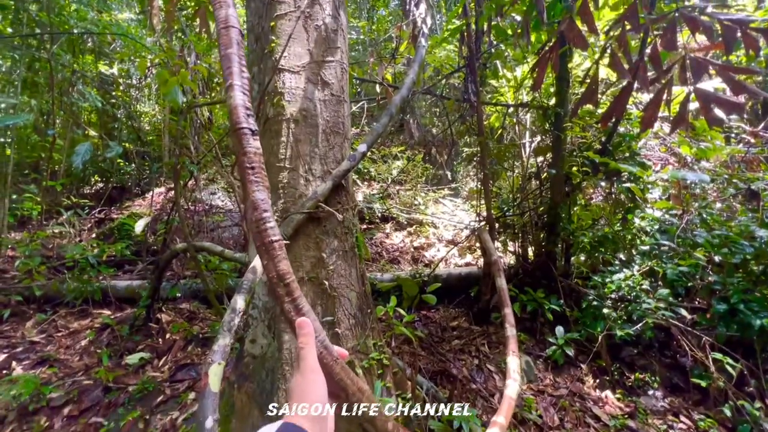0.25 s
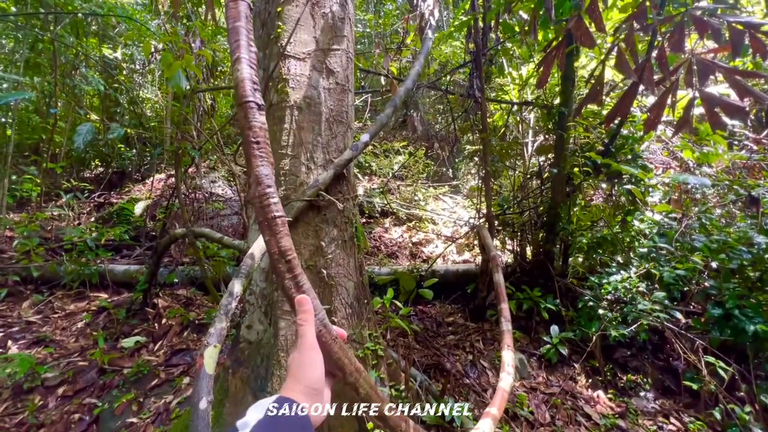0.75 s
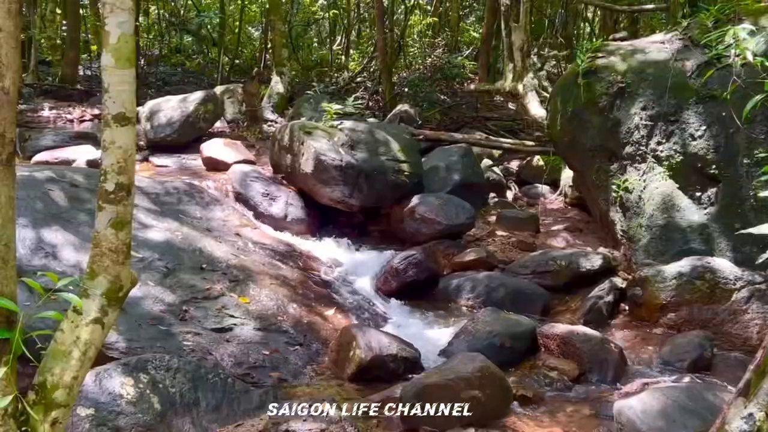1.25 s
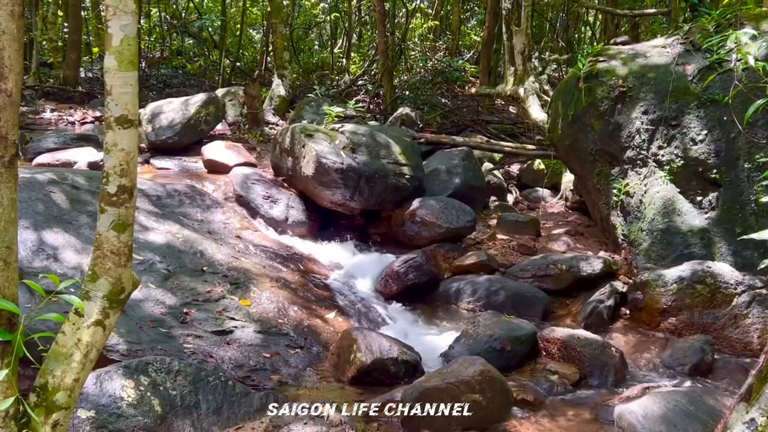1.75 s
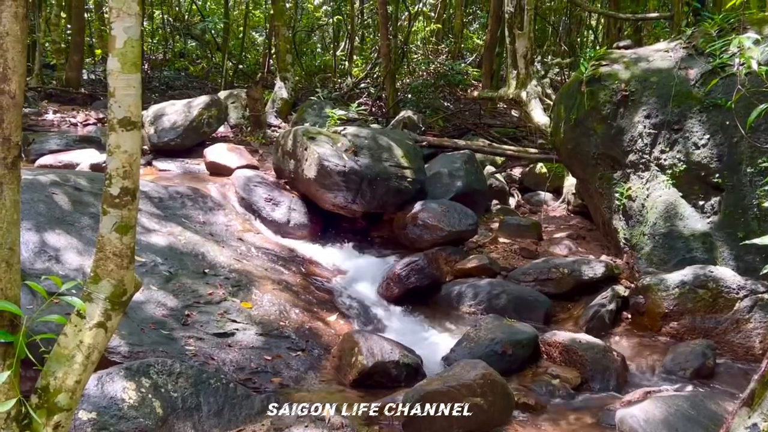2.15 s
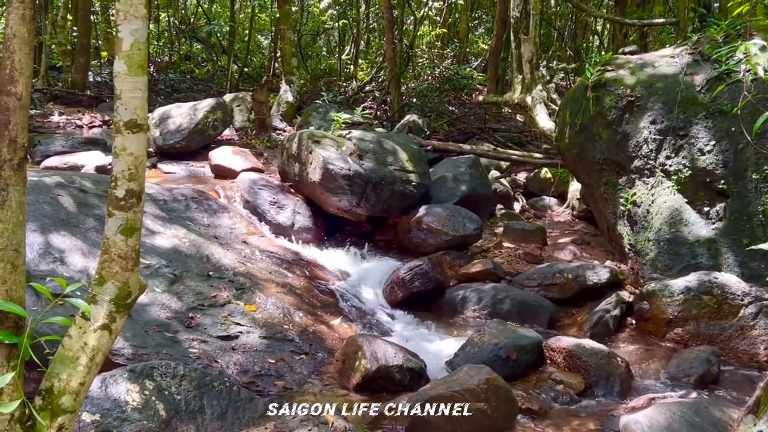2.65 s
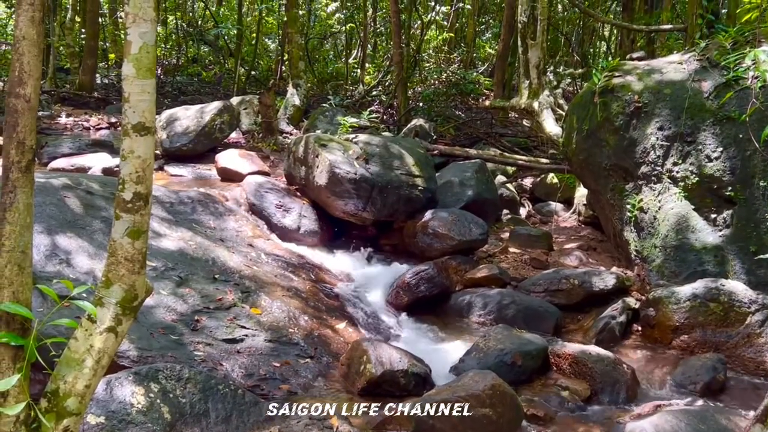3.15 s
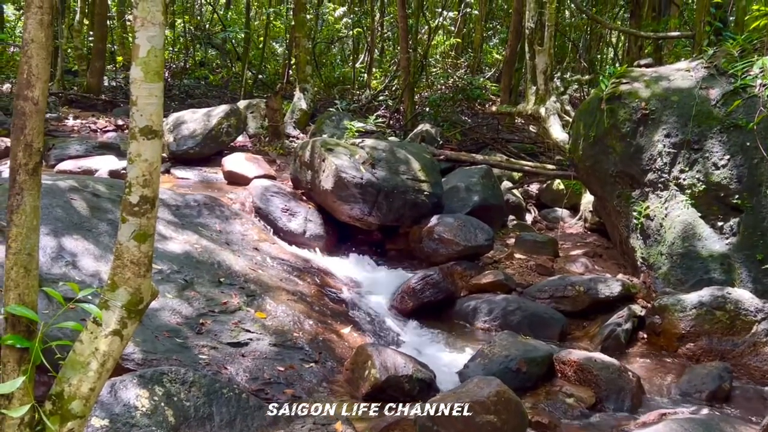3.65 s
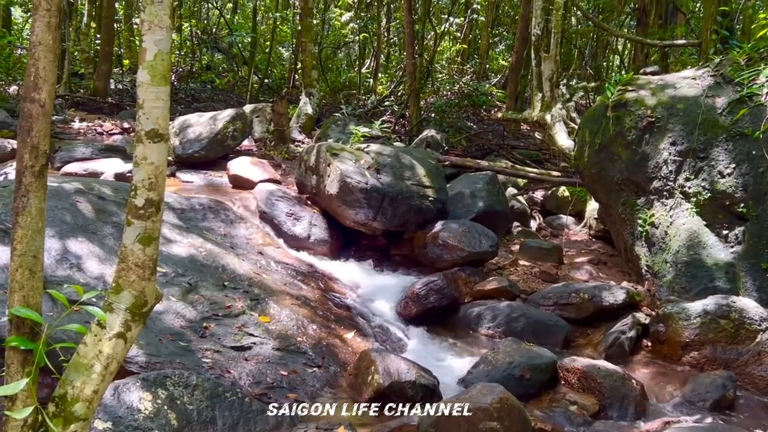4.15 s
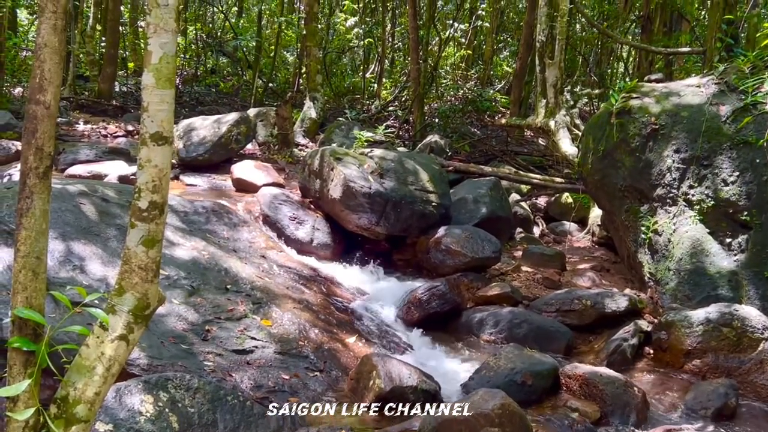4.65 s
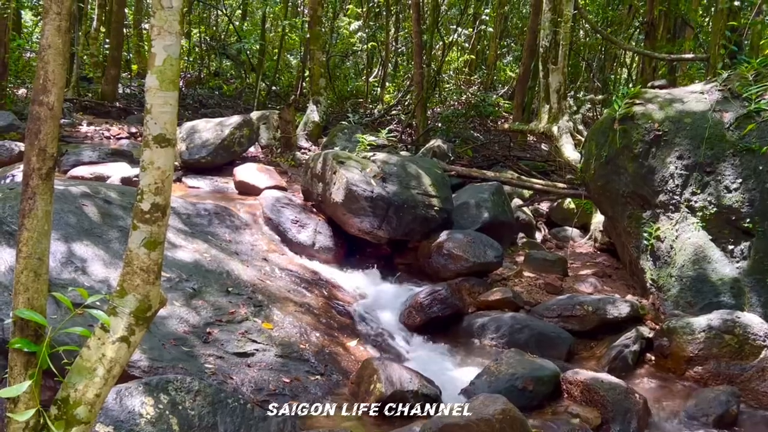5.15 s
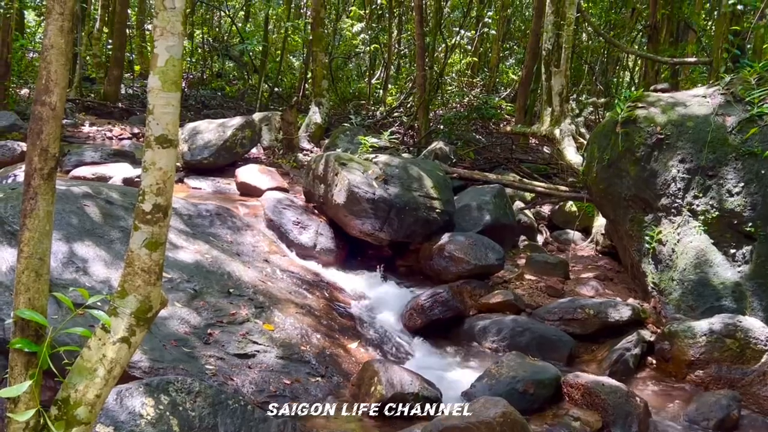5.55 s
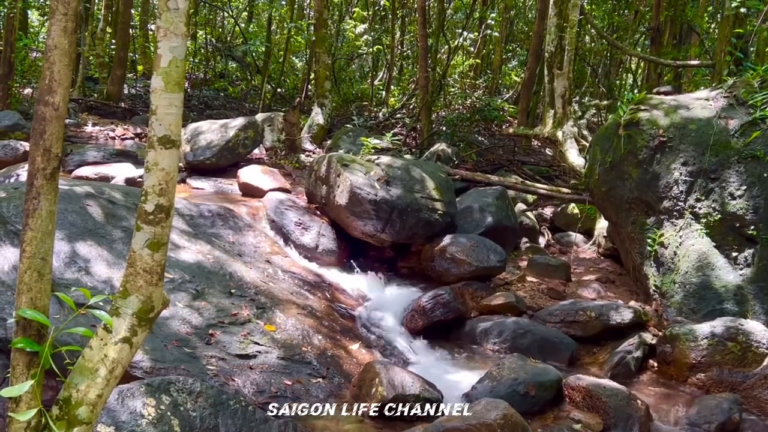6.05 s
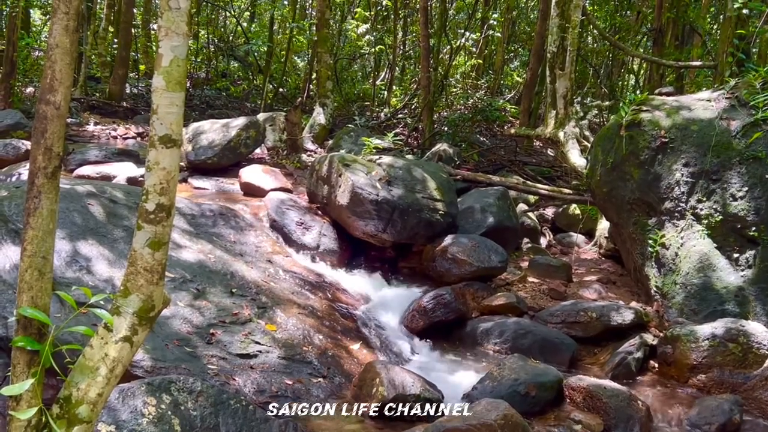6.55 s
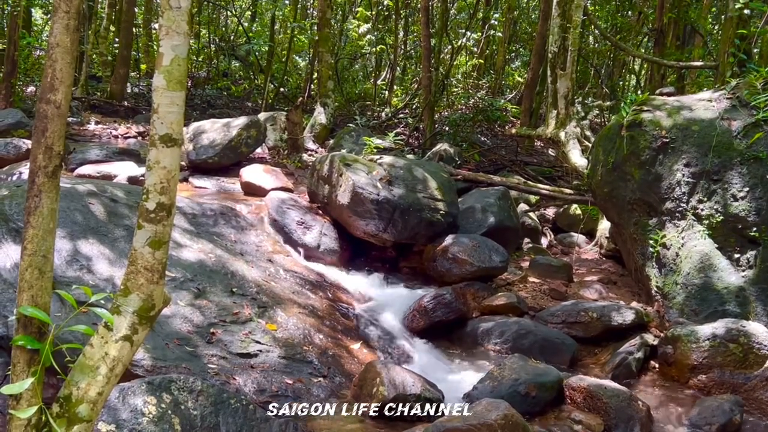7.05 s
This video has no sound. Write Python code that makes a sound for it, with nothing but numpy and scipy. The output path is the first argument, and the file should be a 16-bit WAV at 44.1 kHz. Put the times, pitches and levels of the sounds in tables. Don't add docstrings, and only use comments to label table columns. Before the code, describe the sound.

Outdoors in stereo, about a second of soft far-off brook and airy leaves under a faint high insect buzz dips to silence. A nearby stream swells in quickly and rushes steadily for nearly six seconds, bubbling low and high, with irregular soft thumps in its pool and bright fine spray. It fades out, and quiet forest with tiny water ticks fades in at the end.

```python
import sys
import numpy as np
from scipy import signal
from scipy.fft import rfft, irfft, next_fast_len
from scipy.io import wavfile
from scipy.ndimage import uniform_filter1d, map_coordinates

SR = 44100
rng = np.random.default_rng(int(sys.argv[2]) if len(sys.argv) > 2 else 0)


def master_out(mix):
    frames = np.transpose(np.atleast_2d(mix))
    ceiling = np.clip(frames, -1, 1)
    pcm = np.round(ceiling * 32767).astype(np.int16)
    wavfile.write(sys.argv[1], SR, pcm)


def how_loud(loudness_db):
    steps = np.asarray(loudness_db, float) / 20
    return 10 ** steps


N = 321018

SCENE_CHANGES_S = (1.2, 7.1)


def unit(x):
    return x / np.sqrt(np.mean(x ** 2) + 1e-20)


def along(points, hz):
    f, v = np.transpose(points)
    return np.interp(np.log(hz + 1), np.log(f + 1), v)


def wobble(rate_hz):
    knots = rng.standard_normal(int(N * rate_hz / SR) + 4)
    return map_coordinates(knots, [np.arange(N) * rate_hz / SR])


def filtered(x, response):
    m = next_fast_len(N + SR // 2)
    return irfft(rfft(x, m) * response(np.fft.rfftfreq(m, 1 / SR)), m)[..., :N]


def rush(spectrum, patchy_db):
    z = signal.stft(rng.standard_normal((2, N)), nperseg=512)[2]
    patches = uniform_filter1d(rng.standard_normal(z.shape[1:]), size=4, axis=0)
    patches = uniform_filter1d(patches, size=6, axis=1)
    pair = signal.istft(z * how_loud(patchy_db * unit(patches)), nperseg=512)[1][:, :N]
    return unit(filtered(pair, lambda hz: how_loud(along(spectrum, hz))))


def bubbles(start_s, hz, gain, cycles, rise, size=1000):
    t = np.arange(size)[None] / SR
    age = t * hz[:, None] / cycles
    phase = 2 * np.pi * hz[:, None] * t * (1 + rise * np.minimum(age, 2) / 2)
    envelope = gain[:, None] * age * np.exp(1 - 4.04 * age) * 3.04
    end_taper = np.cos(np.pi / 2 * t / t.max())
    rows = envelope * np.sin(phase) * end_taper
    index = np.round(start_s * SR).astype(int)[:, None] + np.arange(t.size)
    return np.bincount(index.ravel(), rows.ravel(), N + SR)[:N]


def bubble_cloud(count, centre_hz, spread, size_db):
    draw = rng.random((count, 2))
    hz = np.clip(centre_hz * np.exp(spread * rng.standard_normal(count)), 150, 6000)
    gain = how_loud(-size_db * np.log(.012 + draw[:, 1]))
    return unit(bubbles(draw[:, 0] * N / SR, hz, gain, cycles=9.1, rise=0.248))


def ports(pair, alike):
    # [f/Hz, phase/rad]
    port_turn = [(600, .1), (860, .45), (1120, -.1), (2500, .05), (3190, .4), (4000, 0)]
    lag_from_hz, lag_s, lag_onset_hz = 8300, .000275, 900

    def mix(hz):
        angle = np.arccos(np.clip(along(alike, hz), -1, 1)) / 2
        return np.array([np.cos(angle), np.sin(angle)])

    def turn(hz):
        above_hz = hz - lag_from_hz
        lag_rad = 2 * np.pi * lag_s * above_hz * np.clip(above_hz / lag_onset_hz, 0, 1)
        return np.exp(.5j * (along(port_turn, hz) - lag_rad) * np.array([[1], [-1]]))

    common, apart = filtered(pair, mix)
    return filtered(np.array([common + apart, common - apart]), turn)


def far_brook(level_db):
    # [f/Hz, level/dB per Hz]
    brook = [(25, -35), (45, -5), (60, -1), (110, -3), (145, -7), (270, -3), (360, -7), (460, -4),
             (640, -5), (1200, -6), (2200, -10), (3000, -17.5), (3900, -41), (6600, -120)]
    # [f/Hz, width/Hz, level/dB]
    hollow = [(468, 28, 1.5)]

    def pocket(f):
        return 1 + sum(how_loud(db) * 1j * f * w / (c * c - f * f + 1j * f * w) for c, w, db in hollow)

    return how_loud(level_db + 8.5) * filtered(rush(brook, patchy_db=1.6), pocket)


def leaf_hiss(level_db):
    # [f/Hz, level/dB per Hz]
    leaves = [(1800, -32), (2800, -1), (6400, 0.5), (8500, -5), (10500, -9.5), (12500, -21), (15600, -19)]
    return how_loud(level_db + 9.0) * rush(leaves, patchy_db=1.5)


def cicada():
    # [f/Hz, level/dB rms]
    lines = [(5965, -84), (6293, -83), (6665, -93)]
    drift = np.cumsum(6 * wobble(30)) / SR
    t = np.arange(N) / SR
    song = sum(how_loud(db + 6.0) * np.sin(2 * np.pi * (hz * t + drift)) for hz, db in lines)
    return song * how_loud(4.1 * wobble(12))


def brook_drips():
    # [t/s, peak level/dB, f/Hz]
    far_drips = [
        (.185, -49, 467),
        (.705, -50, 470),
        (.81, -57, 780),
        (1.0, -59, 800),
        (7.2314, -66, 1940),
        (7.248, -59, 2010),
        (7.262, -58, 2050),
    ]
    s, db, hz = np.transpose(far_drips)
    return bubbles(s, hz, how_loud(db + 0.5), cycles=28, rise=.03)


def forest():
    first_db = (-65.5, -68.5)
    last_db = (-62.5, -71)
    # [f/Hz, level/dB]
    last_colour = [(100, -0.5), (460, -4), (800, 0.5), (2000, -1), (3000, 0.5), (6500, 1.5), (10000, 3),
                   (14000, 7)]
    # [f/Hz, correlation]
    far_alike = [(60, .9), (150, .7), (380, .35), (900, -.2), (2400, -.1), (8000, 0), (10300, .8),
                 (14000, .88)]
    is_first = np.arange(N) < SCENE_CHANGES_S[1] * SR
    brook_db, hiss_db = np.where(is_first, *np.array([first_db, last_db])[..., None])
    first_bed = far_brook(brook_db) + leaf_hiss(hiss_db)
    last_bed = filtered(first_bed, lambda hz: how_loud(along(last_colour, hz)))
    return ports(np.where(is_first, first_bed, last_bed), far_alike) + cicada() + brook_drips()


def white_water(flow_db, surge):
    # [f/Hz, level/dB per Hz]
    churn = [(76, -37), (130, -1.5), (200, -3), (236, 1), (274, -4), (318, 0.5), (422, -1.5), (477, -6.5),
             (633, -1.5), (1060, -5), (1350, -4), (2080, -7.5), (2650, -11.5), (3300, -18), (4290, -32.5),
             (7260, -120)]
    cloud = bubble_cloud(count=2600, centre_hz=900, spread=0.751, size_db=2.5)
    foam = np.array([cloud, np.zeros(N)])
    water = unit(rush(churn, patchy_db=0.66) + how_loud(-6.5) * foam)
    return how_loud(flow_db - 1 + 0.68 * surge) * water


def plunge_pool(mean_db, swing_db):
    # [f/Hz, level/dB per Hz]
    pool = [(15, -49.5), (25, -19.5), (42, -10.5), (59, 2), (70, 2), (102, -5.5), (150, -8), (200, -16),
            (330, -120)]
    # [t/s, extra level/dB]
    plunges = [
        (2.3, 2),
        (2.95, 2),
        (3.15, 1),
        (3.95, 7),
        (4.4, 4),
        (5.33, 6),
        (5.7, 0),
        (6.27, 0.5),
        (6.62, 3),
    ]
    half_length_s = 0.03
    t = np.arange(N) / SR
    plunge_db = sum(db * np.exp(-((t - s) / half_length_s) ** 2) for s, db in plunges)
    level_db = mean_db - 9.5 + 1.7 * swing_db + plunge_db + 0.92 * wobble(9)
    return how_loud(level_db) * rush(pool, patchy_db=-0.7)


def spray_fizz(mean_db, swing_db, surge):
    # [f/Hz, level/dB per Hz]
    spray = [(1800, -37.5), (3000, -1.5), (5000, 0.5), (8300, -2.5), (11000, -4), (12500, -9),
             (15600, -12.5)]
    level_db = mean_db - 7 + 0.25 * swing_db + 0.28 * surge + 0.3 * wobble(7.2)
    return how_loud(level_db) * rush(spray, patchy_db=1.11)


def single_bubbles():
    # [t/s, peak level/dB, f/Hz]
    large = [(1.448, -29, 540), (1.652, -26.5, 387), (1.881, -22.5, 900), (2.33, -22, 239),
             (2.59, -25, 241), (2.713, -27, 251), (4.07, -25.5, 235), (3.125, -28, 374), (3.239, -20, 1456),
             (4.014, -23.5, 600), (4.257, -37, 523), (4.564, -30, 334), (4.713, -17.5, 538),
             (4.789, -24.5, 237), (5.119, -29.5, 338), (5.768, -22, 230.5), (6.062, -29, 398),
             (6.517, -25, 347)]
    # [t/s, peak level/dB, f/Hz]
    small = [
        (2.5994, -27, 1350),
        (3.4366, -29.5, 1315),
        (3.8676, -32, 1396),
        (3.903, -28.5, 1374),
        (3.9744, -27.5, 1440),
        (4.179, -31, 1480),
        (4.2587, -31, 1690),
        (5.0534, -28.5, 1450),
        (6.537, -24, 2046),
    ]
    s, db, hz = np.transpose(large)
    glugs = bubbles(s - .004, hz, how_loud(db - 7.5), cycles=13.3, rise=0.065, size=3000)
    s, db, hz = np.transpose(small)
    drips = bubbles(s - .004, hz, how_loud(db - 3.0), cycles=29, rise=0.026)
    return glugs + drips


def stream():
    # [t/s, level/dB]
    flow = [(1.3, -36.5), (1.5, -35.5), (2.1, -35), (3.3, -35.5), (4.4, -35.6), (5.1, -35.5), (5.6, -35),
            (6.3, -35.5), (6.97, -34.5)]
    # [f/Hz, correlation]
    near_alike = [(60, .997), (200, .945), (400, .92), (850, .82), (1300, .91), (2000, .925), (5000, .92),
                  (9000, .9), (13000, .87)]
    flow_s, level_db = np.transpose(flow)
    flow_db = np.interp(np.arange(N) / SR, flow_s, level_db)
    mean_db = np.mean(level_db)
    swing_db = flow_db - mean_db
    surge = wobble(14)
    water = white_water(flow_db, surge) + plunge_pool(mean_db, swing_db) + spray_fizz(mean_db, swing_db, surge)
    return ports(water + single_bubbles() * [[1], [.3]], near_alike)


def scene():
    t = np.arange(N) / SR
    at_stream = (t > SCENE_CHANGES_S[0]) & (t < SCENE_CHANGES_S[1])
    return np.where(at_stream, stream(), forest())


def fade(start_s, full_s, fall_s, silent_s, cut_s):
    t = np.arange(N) / SR
    ramp = np.interp(t, [start_s, full_s, fall_s, silent_s], [0, 1, 1, 0])
    return np.sin(np.pi / 2 * ramp) ** 2 * (t < cut_s)


def thin_sum_difference(x):
    band_edges = [0, 48, 56, 64, 72, 80, 88, 96, 108, 120, 132, 144, 160, 176, 196, 216, 240, 264, 292, 320, 352, 384, *range(416, 1024, 16)]
    # [f/Hz, level/dB]
    least_ratio = [(1000, -30), (1500, -16), (3400, -13), (4500, -10.5), (8000, -8), (10300, -7),
                   (13000, -4.5), (15000, -4.5)]
    # [f/Hz, level/dB a line]
    inaudible = [(9000, -130), (11000, -112), (13000, -110), (15000, -107.5)]
    # [f/Hz, level/dB]
    sparse = [(6000, -20), (9000, -10), (11000, -6), (13000, -3.5), (15500, -2)]
    pair = np.array([x[0] + x[1], x[0] - x[1]]) / 2
    hz, t, z = signal.stft(pair, SR, "cosine", nperseg=2048)
    band_hz = hz[band_edges]
    power = np.abs(z) ** 2
    width = np.diff([*band_edges, hz.size])[:, None]
    level_db = 10 * np.log10(np.add.reduceat(power, band_edges, axis=1) / width + 1e-20)
    unsteady_db = 0.7 * wobble(22)[np.minimum(t * SR, N - 1).astype(int)]
    kept = level_db - level_db[::-1] > along(least_ratio, band_hz)[:, None] + unsteady_db
    jitter_db = 2.5 * rng.standard_normal(level_db.shape[1:])
    kept &= level_db > along(inaudible, band_hz)[:, None] + jitter_db
    floor_db = .83 * level_db.max(axis=0) - 13.2 + along(sparse, band_hz)[:, None]
    band = np.searchsorted(band_edges, np.arange(hz.size), "right") - 1
    kept = kept[:, band] & (power > how_loud(2 * floor_db[band]))
    mid, side = signal.istft(z * kept, SR, "cosine", nperseg=2048)[1][:, :N]
    return np.array([mid + side, mid - side])


def low_pass(x):
    return signal.sosfilt(signal.butter(12, 15900, fs=SR, output="sos"), x)


def record(dry):
    # [fade-in start/s, full/s, fade-out start/s, would-be silence/s, hard cut/s]
    shots = [
        (-1, -.9, 1.045, 1.215, 1.155),
        (1.243, 1.41, 6.968, 7.135, 7.053),
        (7.122, 7.29, 8, 9, 9),
    ]
    limited = filtered(dry, lambda hz: (hz < 15750) / (1 + (33 / (hz + 1)) ** 6))
    fades = sum(fade(*shot) for shot in shots)
    return low_pass(fades * thin_sum_difference(limited))


dry = scene()
out = record(dry)
master_out(out)
```